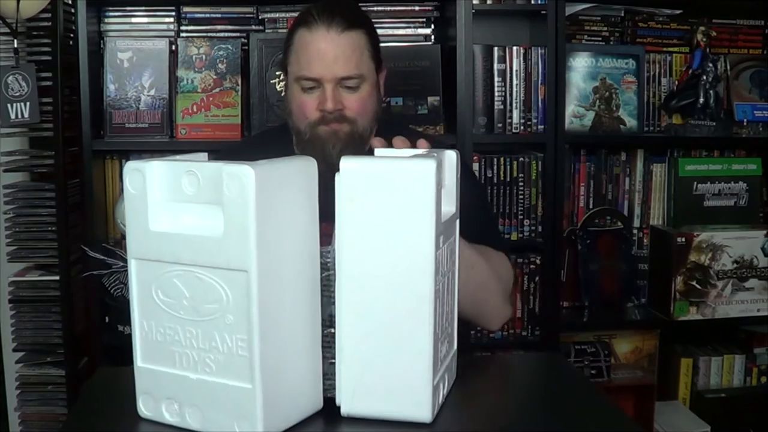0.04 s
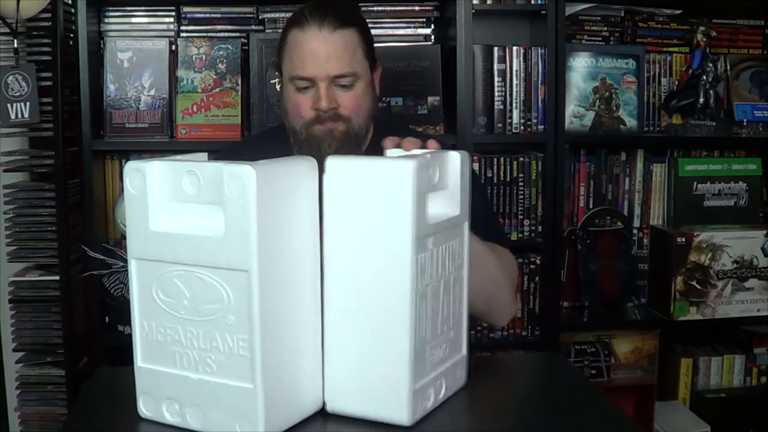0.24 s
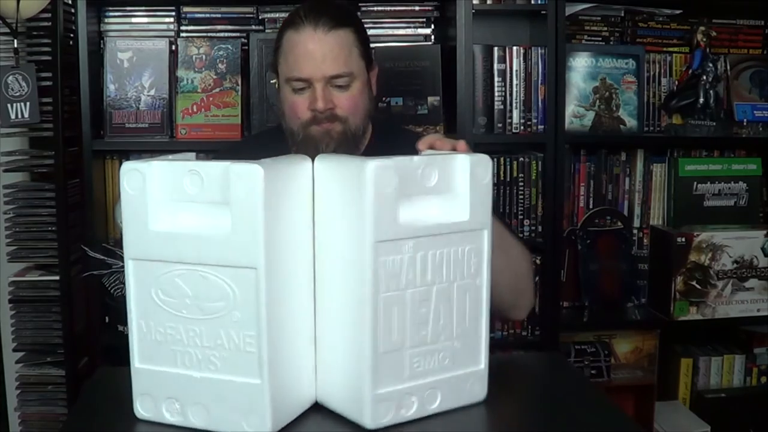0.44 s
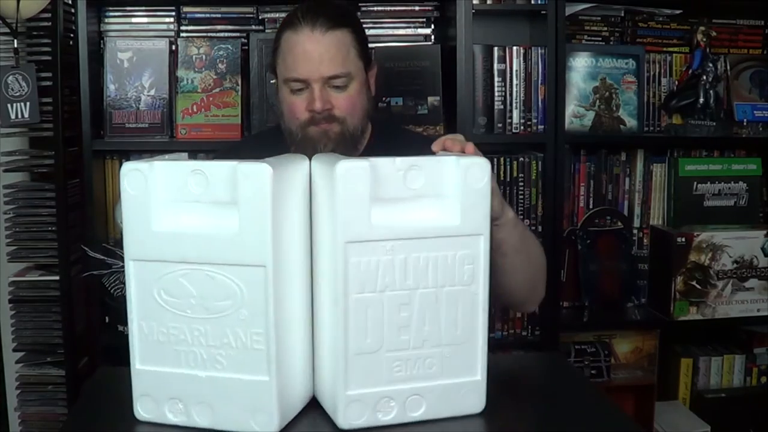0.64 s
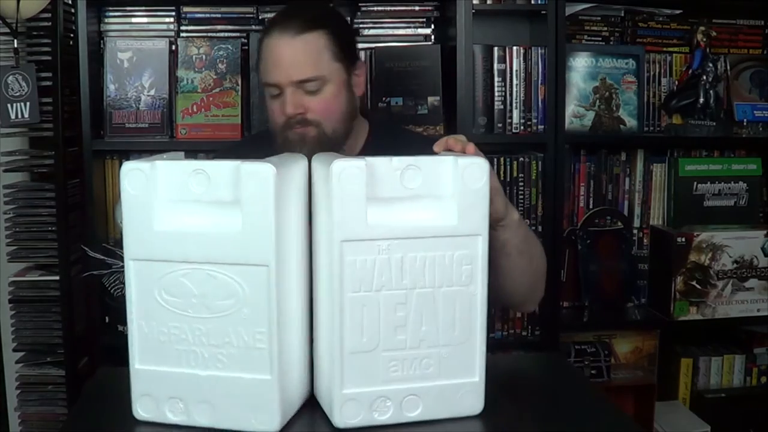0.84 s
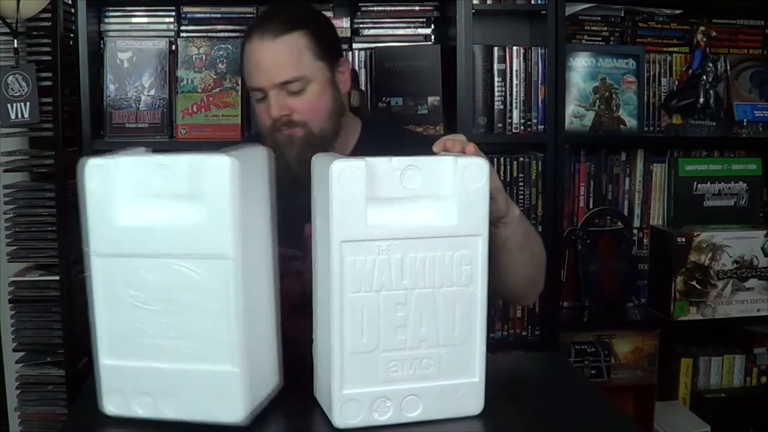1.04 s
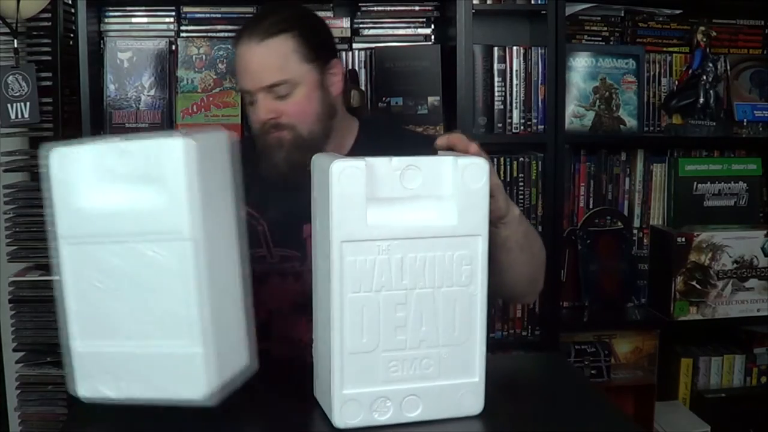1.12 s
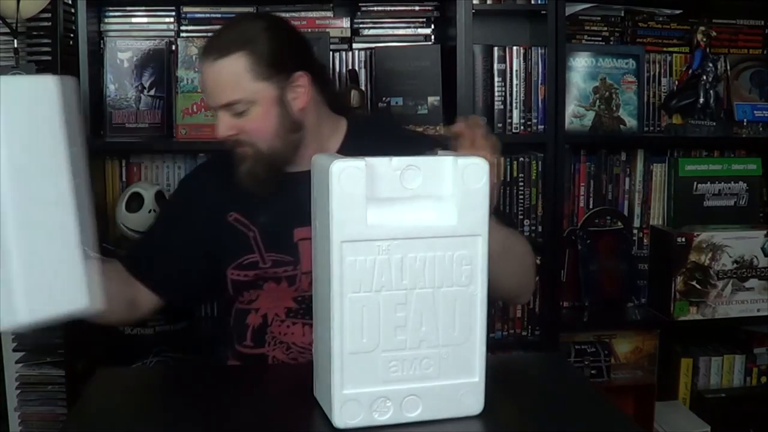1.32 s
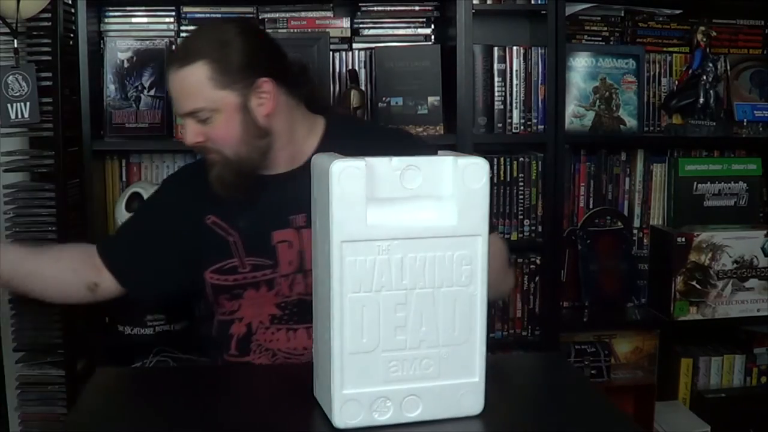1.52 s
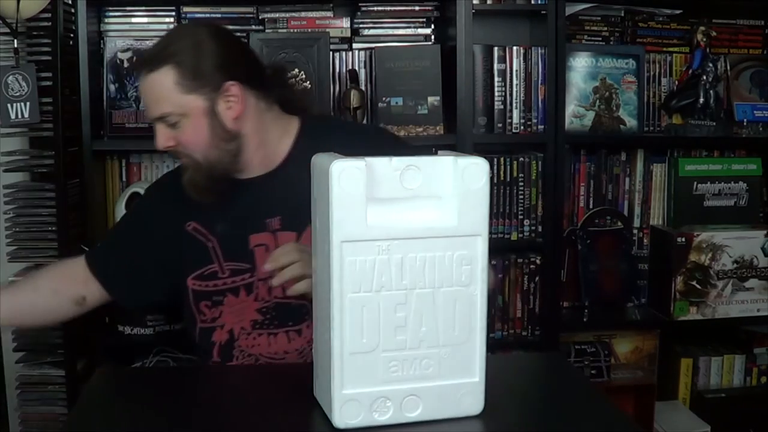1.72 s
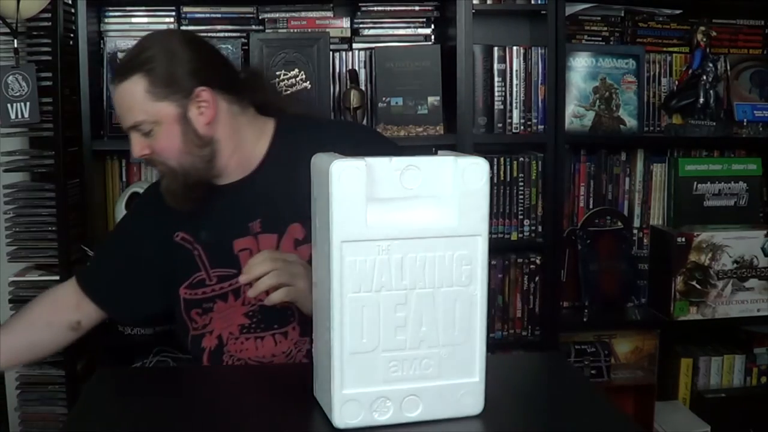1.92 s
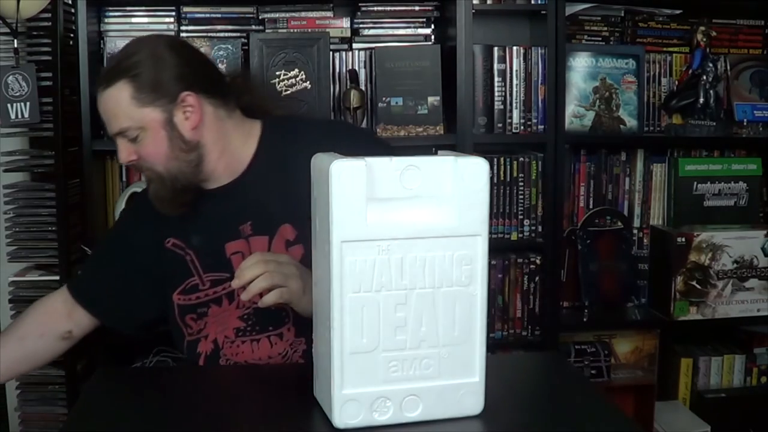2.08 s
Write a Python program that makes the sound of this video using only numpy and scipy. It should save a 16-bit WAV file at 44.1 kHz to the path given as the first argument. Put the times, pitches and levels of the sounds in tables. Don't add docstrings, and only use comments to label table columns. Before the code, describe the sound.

Dry foam scraping swells into a short squeak, followed by bead snaps and light hollow knocks.

```python
import sys
import numpy as np
from scipy import signal
from scipy.fft import rfft, irfft
from scipy.io import wavfile

SR = 44100
rng = np.random.default_rng(int(sys.argv[2]) if len(sys.argv) > 2 else 0)


def attenuation_scalar(level_db):
    decades = np.asarray(level_db, float) / 20
    return 10 ** decades


def unload_audio(sound):
    columns = np.transpose(np.atleast_2d(sound))
    steps = np.round(np.clip(columns, -1, 1) * 32767)
    wavfile.write(sys.argv[1], SR, steps.astype(np.int16))


N = 94815
T = np.arange(N) / SR

# t/s, rubbing level/dB, extra weight on the hollow body/dB
STROKES = [
    [(0, -66.5, 3), (.01, -50, 5.5), (.065, -42.5, -3), (.105, -63, 11)],
    [(.112, -53, 4), (.13, -41.5, -3), (.25, -34, -7.5), (.33, -30.5, -9), (.484, -27, -13.5),
     (.49, -28, -11.5), (.512, -28, -13), (.562, -37, -2.5)],
    [(.6, -32.5, -14.5), (.65, -36, -5.5), (.705, -49, -2), (.76, -44, 0.5), (.783, -54, 5.5),
     (.796, -43.5, -4.5), (.84, -53, -3.5)],
    [(.87, -50.5, 1.5), (.95, -60, 3.5), (1.02, -77, 5)],
]
# t/s, level/dB, weight/dB, attack/s, fade/(dB per s)
SCUFFS = [
    (1.108, -56, -8, 0.0018, 157),
    (1.118, -43, 5, 0.0022, 262),
    (1.261, -55, 2.5, 0.0029, 216),
    (1.487, -57.5, 1, .015, 200),
    (1.545, -45.5, 1.5, 0.0053, 267),
    (1.66, -54.5, -2, 0.16, 206),
    (2.045, -53, 2.5, 0.064, 221),
]
# f/Hz, level/dB per Hz
BEAD_HISS = [(2000, -8.5), (3500, 0), (5900, 1), (7300, -0.5), (8000, 1.5), (10300, 0.5), (12500, -12),
             (15600, -11.5), (16300, -47)]
# f/Hz, width/Hz, level/dB
BEAD_PEAKS = [(8300, 800, 1), (9520, 1050, 6), (10500, 1700, 7), (6170, 370, -12), (11400, 780, -6)]
# f/Hz, level/dB per Hz
BODY_DRAG = [(50, -44), (150, -18), (300, -4), (480, -14), (1000, -4.5), (2300, -7.5), (3800, -7.5),
             (5500, -48)]
# f/Hz, level/dB, time to fall 60 dB/s
SHELL = [(202, 7, 0.42), (430, -6.5, 0.12), (496.4, -2, 0.085), (590, -5, 0.11), (687, -5.5, 0.052),
         (805, -5, 0.03), (925.4, -2.5, 0.1), (1100, 0, 0.045), (1400, -4.5, 0.055), (1565, -8, 0.081),
         (1686, -2, 0.04), (1885, -1, 0.019), (2194, 1, 0.033), (2370, -24.5, 0.044)]
# f/Hz, width/Hz, level/dB, delay/ms, hold/s
SQUEAK = [(2520, 210, -33, 11.2, 0.025), (2580, 680, -34.5, 1.1, .01), (5230, 390, -34, 3, 0.014),
          (2560, 150, -41.5, 68, .004), (5270, 200, -33.5, 18, 0.0075), (6530, 300, -27, 5, 0.01),
          (7720, 360, -30, 4.3, 0.015), (8630, 670, -23.5, 7.9, 0.018), (10070, 870, -23.5, 0.8, 0.014),
          (11500, 1000, -23, 2.6, 0.0083), (12900, 370, -28.5, 5.3, 0.011), (14600, 970, -32.5, 3, 0.013)]
# t/s, peak level/dB, brightness/dB per octave
SNAPS = [(.012, -31.5, -4.5), (0.0215, -28.5, -9.5), (.45, -13, 0), (.488, -24, -12.5), (0.753, -40, 0),
         (0.772, -21, 1), (0.7878, -9, -0.5), (0.793, -28, 0), (0.7952, -25, 0), (.81, -40, 0),
         (.873, -32.5, 0), (1.105, -33, -9), (1.1186, -21.5, -1), (1.151, -48, 0), (1.178, -36, 0),
         (1.26, -40, 2), (1.543, -30, -5)]
# f/Hz, level/dB, time to fall 60 dB/s
SNAP_RINGS = [(6150, -3.5, 0.0074), (8040, 0, 0.0074), (8500, 5, 0.0056), (9760, 11, 0.0023),
              (11830, 1, 0.0036), (14700, 3, 0.0028), (2070, -8.5, 0.0042)]
# t/s, peak level/dB, favoured f/Hz, reach/octaves, contact fall of 60 dB/s
KNOCKS = [(.006, -24, 1730, 0.12, 0.039), (0.0227, -21.5, 1560, 0.5, 0.035), (0.031, -29, 1580, 0.22, .06),
          (.274, -30, 805, 2.1, 0.058), (0.316, -23.5, 700, 1.25, 0.0097), (0.75, -34, 600, 2.5, .03),
          (.86, -33, 590, 1.8, 0.041), (.873, -31.5, 590, 1, 0.055), (.9, -33.5, 415, 0.29, .03),
          (.987, -46, 450, 0.69, .02), (1.106, -28, 1500, 1.7, 0.0034), (1.1055, -19, 425, .12, 0.01),
          (1.118, -26, 1510, 1.06, 0.059), (1.121, -30.5, 430, .15, 0.022), (1.155, -25, 645, 0.4, 0.01),
          (1.166, -28.5, 495, 0.15, 0.035), (1.197, -25, 503, 0.24, 0.02), (1.216, -26.5, 500, 0.21, 0.02),
          (1.259, -29, 1640, 0.25, 0.01), (1.2595, -34, 1100, 0.26, .01), (1.2599, -27, 507, 0.26, 0.023),
          (1.276, -33, 1100, 0.27, .02), (1.543, -24, 790, 0.21, 0.0081), (1.544, -30.5, 1580, 1.1, 0.023),
          (1.551, -22.5, 920, 0.29, 0.088), (1.56, -31.5, 520, 0.33, .03), (1.607, -38, 900, 0.36, 0.052),
          (1.632, -36, 523, 0.4, 0.03), (1.66, -43, 810, 0.43, .04), (1.737, -35, 495, 0.19, 0.034),
          (1.772, -47, 503, 0.18, .03), (2.014, -42, 1920, 0.26, .03), (2.026, -40, 1030, 0.34, 0.018),
          (2.035, -27.5, 507, 0.16, 0.02), (2.047, -25.5, 690, .3, .015), (2.054, -30, 500, 0.15, 0.02),
          (2.059, -32, 1090, 0.4, 0.033), (2.081, -39.5, 505, 0.15, .03), (2.123, -53, 475, 0.17, .02)]
# t/s, level/dB, f/Hz
THUMPS = [
    (0.053, -62, 149),
    (0.32, -56.5, 110),
    (.775, -65, 95),
    (.85, -64, 160),
    (1.111, -61, 189),
    (1.183, -59, 176),
]
# f/Hz, level/dB per Hz
HUSH = [(25, -30), (70, -7.5), (130, -5.5), (230, 3.5), (500, 4.5), (1300, 3), (7700, -5), (16000, -6.5)]
# f/Hz, side minus middle/dB
HUSH_SIDE = [(30, -8), (150, -15.5), (500, -1), (5000, 0), (8000, -1), (15000, -26)]
# f/Hz, width/Hz, level/dB
WHINES = [(3400, 200, -73), (5300, 250, -75), (2500, 250, -73)]
# t/s, f/Hz, level/dB
MOTOR_WHINE = [(0, 10670, -85), (1.5, 10250, -74), (1.6, 10600, -64), (1.839, 10250, -72),
               (1.89, 10660, -68), (2.02, 11300, -66), (2.15, 11000, -70)]


def rms_one(x):
    return x / np.sqrt(np.mean(x ** 2) + 1e-20)


def colour(x, points):
    hz, db = np.transpose(points)
    f = np.fft.rfftfreq(N, 1 / SR) + 1
    gain = attenuation_scalar(np.interp(np.log(f), np.log(hz), db, left=db[0] - 38))
    return rms_one(irfft(rfft(x) * gain, N))


def drift(rate):
    r = np.exp(-2 * np.pi * rate / SR)
    walk = signal.lfilter([1], [1, -2 * r, r * r], rng.standard_normal(N + SR))
    return rms_one(walk[SR:])


def resonate(x, hz, width_hz):
    r = np.exp(-np.pi * width_hz / SR)
    top = np.array([1, 0, -1]) * (1 - r * r) / 2
    return signal.lfilter(top, [1, -2 * r * np.cos(2 * np.pi * hz / SR), r * r], x + 1e-18)


def ring(clicks, hz, t60):
    r, w = attenuation_scalar(-60 / (t60 * SR)), 2 * np.pi * hz / SR
    return signal.lfilter([0, np.sin(w)], [1, -2 * r * np.cos(w), r * r], clicks + 1e-18)


def above(x, hz, order):
    return signal.sosfilt(signal.butter(order, hz, "high", fs=SR, output="sos"), x)


def grains(per_s, spread_db, clump_db):
    sizes = attenuation_scalar(spread_db * np.minimum(rng.exponential(1, N), 5)) * rng.choice([-1, 1], N)
    chance = per_s * attenuation_scalar(clump_db * drift(60)) / SR
    return sizes * (rng.random(N) < chance)


def bead_hiss(face):
    slips_per_s, spread_db = 7500, 2.1
    slips = grains(slips_per_s, spread_db, clump_db=1.77)
    tuned = 0
    for hz, width, db in BEAD_PEAKS:
        band = resonate(grains(slips_per_s, spread_db, clump_db=3.0), hz, width)
        tuned = tuned + attenuation_scalar(db + 5.0 * drift(3.3)) * rms_one(band)
    share = attenuation_scalar(3.5) * (face / face.max()) ** 0.4
    return (colour(slips, BEAD_HISS) + share * rms_one(tuned)) / np.sqrt(1 + share ** 2)


def wall_drag():
    wall_ring_db = -6
    catches = grains(4000, 2.5, clump_db=2.0)
    walls = 0
    for hz, db, t60 in SHELL[1:]:
        mode = resonate(resonate(catches, hz, 5.8 / t60), hz, hz)
        walls = walls + attenuation_scalar(db + 6.8 * drift(7.9)) * rms_one(mode)
    return rms_one(colour(catches, BODY_DRAG) + attenuation_scalar(wall_ring_db) * rms_one(walls))


def rubbing():
    s, level_db, weight_db = np.transpose(np.concatenate(STROKES))
    face = attenuation_scalar(np.interp(T, s, level_db, right=-99))
    wall = face * attenuation_scalar(np.interp(T, s, weight_db))
    light = 0
    for peak_s, db, scuff_weight_db, attack_s, fade in SCUFFS:
        rise = np.clip((T - peak_s) / attack_s + 1, 0, 1) ** 2
        shape = attenuation_scalar(db - fade * np.maximum(T - peak_s, 0)) * rise
        face = np.hypot(face, shape)
        light = np.hypot(light, shape * attenuation_scalar(scuff_weight_db))
    drag = wall_drag()
    return face * bead_hiss(face) + wall * drag + light * above(drag, 393, 4)


def squeak():
    squeak_s, attack_s, t60_s = .487, .004, 0.081
    cycle_hz, sag_per_s, waver = 1298, .4, 0.0121
    locked_share = .42
    pitch_hz = cycle_hz * (1 - sag_per_s * (T - squeak_s) + waver * drift(115))
    cycle = 2 * np.pi * np.cumsum(pitch_hz) / SR
    out = 0
    for hz, width, db, delay_ms, hold in SQUEAK:
        start = squeak_s + delay_ms / 1000
        rise = np.clip((T - start) / attack_s + 1, 0, 1)
        fall = attenuation_scalar(-60 * np.maximum(T - start - hold, 0) / t60_s)
        loose = rms_one(resonate(resonate(rng.standard_normal(N), hz, width), hz, 2 * width))
        tone = np.sin(round(hz / cycle_hz) * cycle + rng.uniform(0, 2 * np.pi))
        locked = np.sqrt(2) * attenuation_scalar(1.8 * drift(90.4)) * tone
        mix = np.sqrt(locked_share) * locked + np.sqrt(1 - locked_share) * loose
        out = out + attenuation_scalar(db) * rise * fall * mix
    return out


def snaps():
    s, db, tilt_db = np.transpose(SNAPS)
    spread_db = rng.normal(0, 1.4, (len(s), len(SNAP_RINGS)))
    out = 0
    for k, (hz, mode_db, t60) in enumerate(SNAP_RINGS):
        clicks = np.zeros(N)
        bright_db = tilt_db * np.log2(hz / 9000)
        clicks[(s * SR).astype(int)] = attenuation_scalar(db + mode_db - 11.5 + bright_db + spread_db[:, k])
        out = out + ring(clicks, hz, t60) * (-1) ** k
    return above(out, 1200, 2)


def knocks():
    first_touch, crunch, knock_db, mode_spread_db = 1.205, 0.46, -13.5, 1.5
    out, n = np.zeros(N + SR), SR // 4
    for s, db, spot_hz, reach, t60_s in KNOCKS:
        decay = attenuation_scalar(-60 * np.arange(n) / SR / max(t60_s, .003))
        contact = rng.standard_normal(n) * crunch * decay / np.sqrt(np.sum(decay ** 2))
        contact[0] += first_touch
        i = int(s * SR)
        for hz, mode_db, t60 in SHELL:
            away_db = 17.5 * (np.log2(hz / spot_hz) / reach) ** 2
            level_db = db + knock_db + mode_db + rng.normal(0, mode_spread_db) - away_db
            out[i:i + n] += attenuation_scalar(level_db) * ring(contact, hz, t60)
    return above(out[:N], 320, 4)


def table_thumps():
    push_s, t60_s = 0.0013, 0.14
    out = 0
    for s, db, hz in THUMPS:
        push = attenuation_scalar(db) * np.exp(-((T - s) / push_s) ** 2) / (push_s * SR)
        out = out + ring(push, hz, t60_s)
    return above(out, 47, 2)


def room(x):
    t60_s, wall_cut_hz = 0.39, 4450
    out, dull = np.zeros((2, N)), np.exp(-2 * np.pi * wall_cut_hz / SR)
    lags = (rng.uniform(.006, .03, 16) * SR).astype(int)
    for k, lag in enumerate(lags):
        loop, gain, state = x.copy(), attenuation_scalar(-60 * lag / SR / t60_s), [0.]
        for i in range(lag, N, lag):
            back, state = signal.lfilter([gain * (1 - dull)], [1, -dull], loop[i - lag:i], zi=state)
            loop[i:i + lag] += back[:N - i]
        out[k % 2] += (loop - x) * (-1) ** (k // 2)
    return out


def hush():
    level_db = -58
    mid = attenuation_scalar(level_db + drift(3.2) / 2) * colour(rng.standard_normal(N), HUSH)
    hz, db = np.transpose(HUSH_SIDE)
    f = np.fft.rfftfreq(N, 1 / SR) + 1
    other = attenuation_scalar(level_db) * colour(rng.standard_normal(N), HUSH)
    side = irfft(rfft(other) * attenuation_scalar(np.interp(np.log(f), np.log(hz), db)), N)
    return mid, side


def whines():
    out = 0
    for hz, width, db in WHINES:
        out = out + attenuation_scalar(db + 4.3 * drift(44)) * rms_one(resonate(rng.standard_normal(N), hz, width))
    s, hz, db = np.transpose(MOTOR_WHINE)
    wobble = drift(330) + 1j * drift(330)
    turning = np.exp(2j * np.pi * np.cumsum(np.interp(T, s, hz)) / SR)
    return out + attenuation_scalar(np.interp(T, s, db)) * np.real(wobble * turning)


def screen_whistle():
    line_hz, flicker_hz, flicker, level_db = 15624.5, 50, 0.41, -63.5
    pulse = 1 + flicker * np.cos(2 * np.pi * flicker_hz * T + 1.0)
    return attenuation_scalar(level_db) * pulse * np.sin(2 * np.pi * line_hz * T)


def background():
    mid, side = hush()
    mid = mid + whines() + screen_whistle()
    return mid + side * np.array([[1], [-1]])


def scene():
    case = rubbing() + squeak() + snaps() + knocks() + table_thumps()
    wet = attenuation_scalar(-15) * room(signal.lfilter([1, -.7], [1, -.3], case))
    near = case - .65 * resonate(case, 4500, 600) + wet
    pan_db = np.interp(T, [0, 1.0, 1.5, 2.15], [0.11, .3, 2.5, 1.6])
    return near * attenuation_scalar(np.array([pan_db, -pan_db]) / 2) + background()


def roll_off(x):
    return signal.sosfilt(signal.butter(12, 16830, fs=SR, output="sos"), x)


def record(dry):
    top_hz = 15850
    steep = signal.cheby2(10, 26, top_hz + 150, fs=SR, output="sos")
    return roll_off(signal.sosfilt(steep, dry))


dry = scene()
out = record(dry)
unload_audio(out)
```